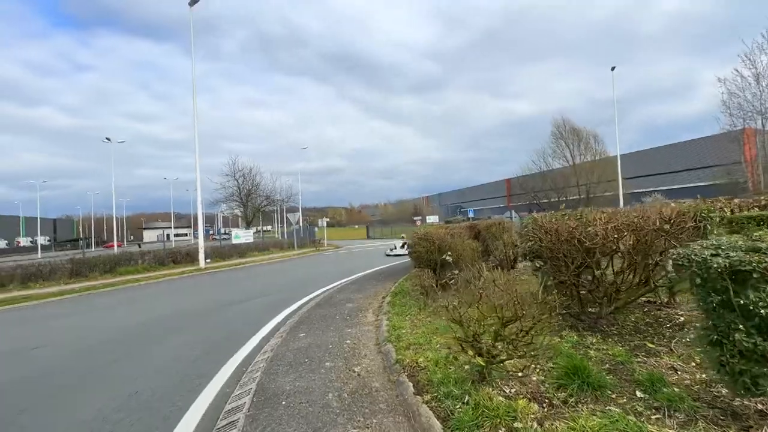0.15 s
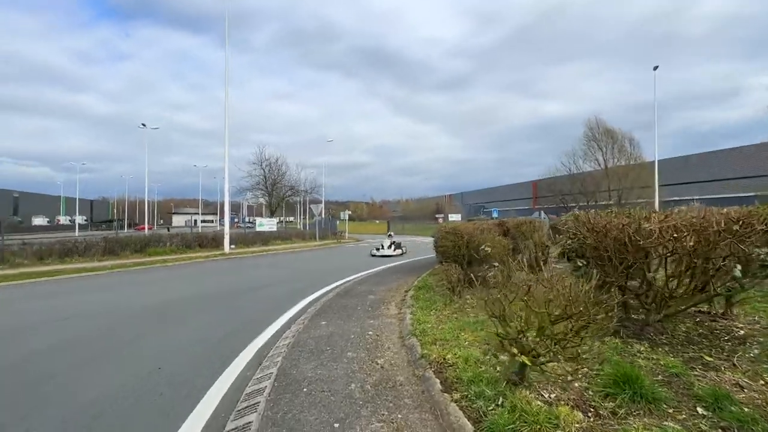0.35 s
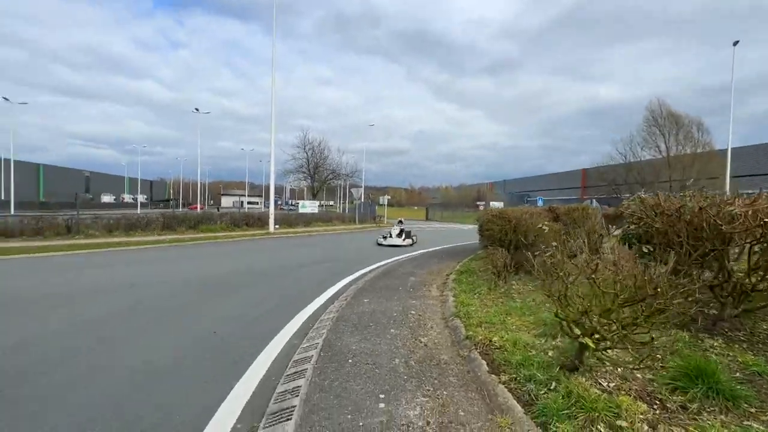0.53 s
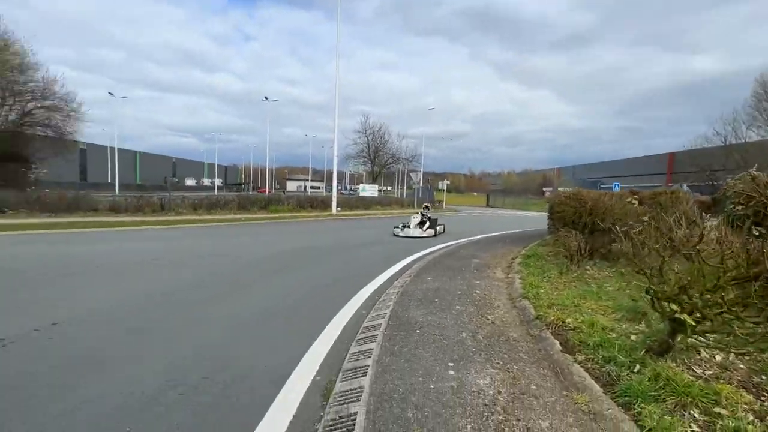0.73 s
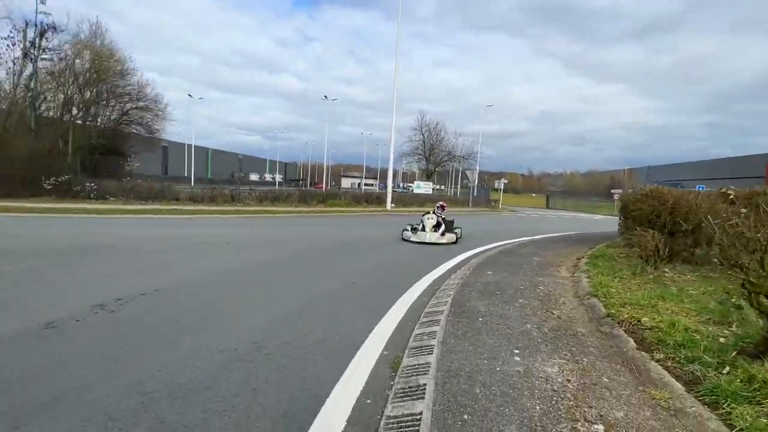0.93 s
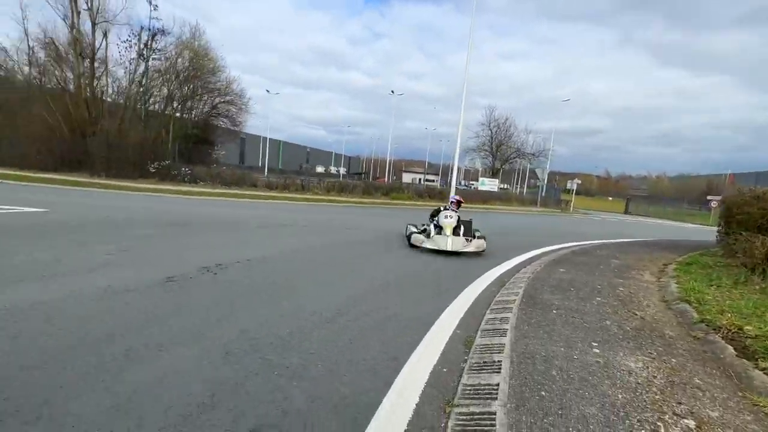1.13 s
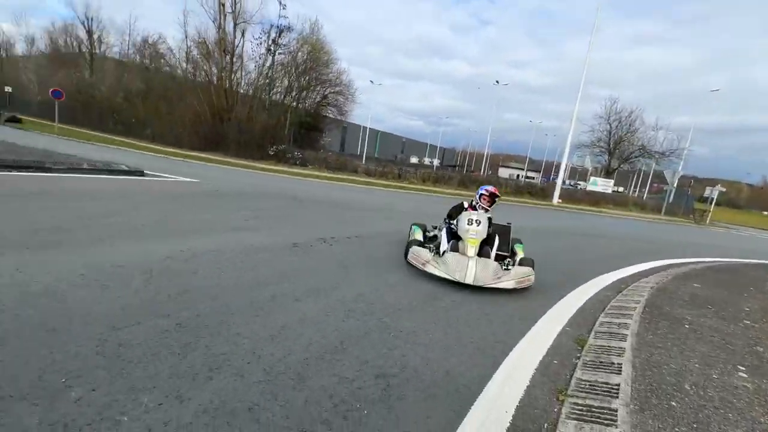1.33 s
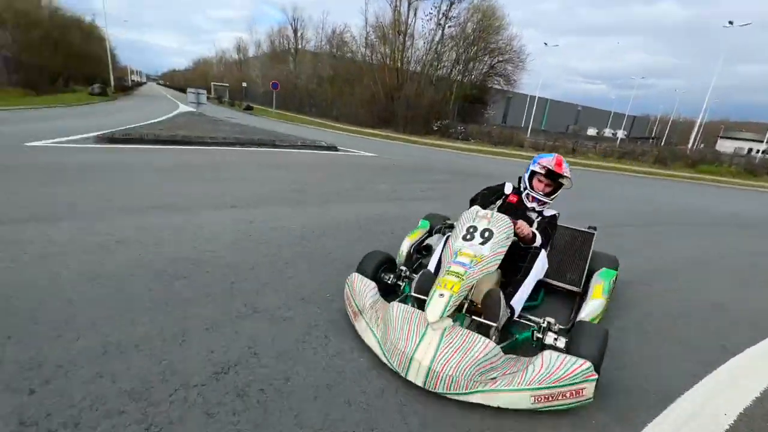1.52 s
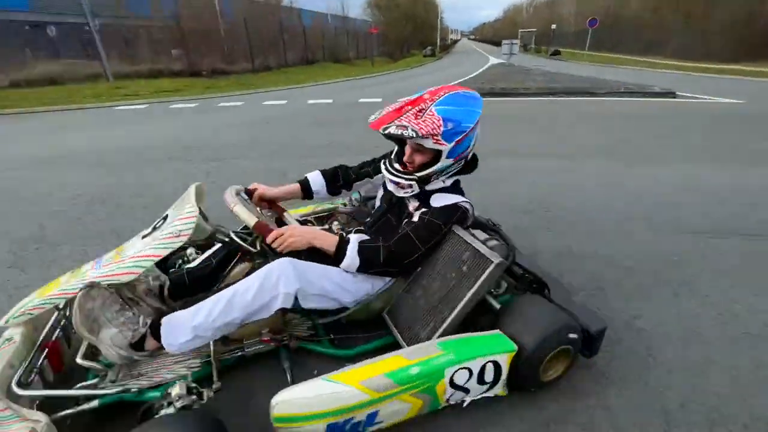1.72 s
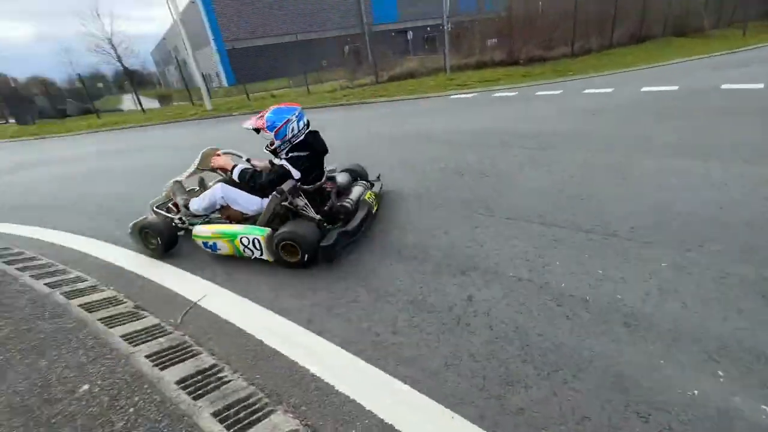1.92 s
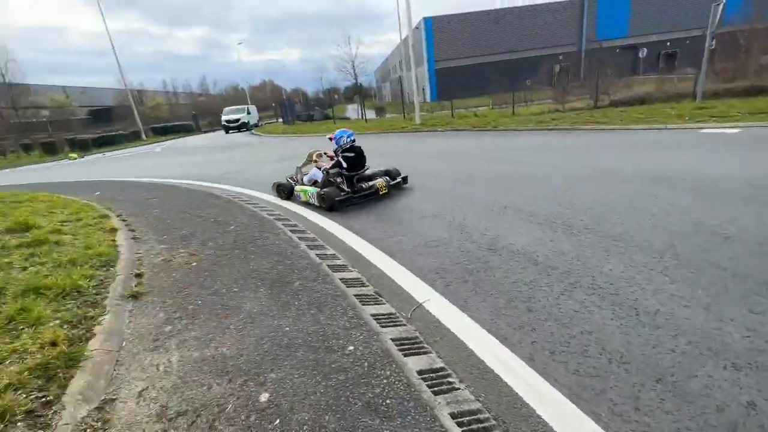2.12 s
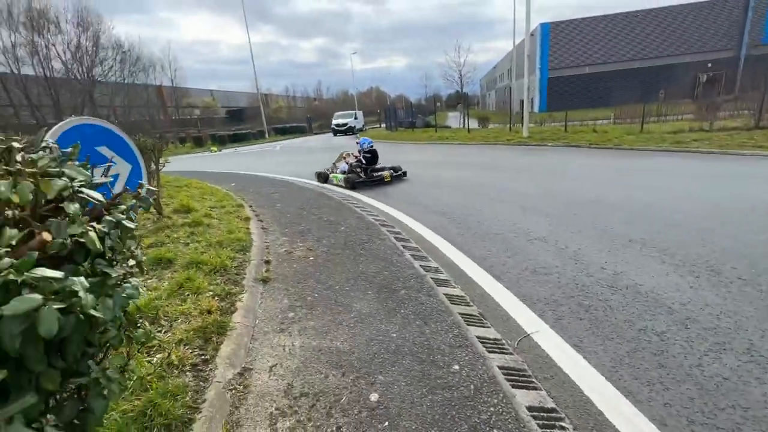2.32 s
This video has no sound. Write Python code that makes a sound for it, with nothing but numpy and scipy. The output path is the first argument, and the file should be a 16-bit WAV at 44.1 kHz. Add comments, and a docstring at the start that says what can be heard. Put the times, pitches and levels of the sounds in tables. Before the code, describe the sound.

A small racing kart engine is quiet and distant at first, its note sagging until 0.3 s, then rising quickly from 0.45 s to a buzzing drone near 0.9 s. Faint tyre chirps sound around 0.3-0.5 s. It swells, choppy and raspy, to a close pass at 1.3-1.85 s, with a short high squeal at 1.8 s, drops near 2 s, then revs away. Low wind and dull echoes accompany it.

```python
"""On a paved road a racing kart comes up, lifts off, opens the throttle, sweeps close by and accelerates away.
Every firing gives an exhaust pulse (a stack of sine orders), a crack (ringing shell modes) and a puff of
rasp (gated noise); the airbox honks under throttle. A treble hiss swells with the pass, drops, then jumps
back up as the kart leaves. The note turns choppy and the tyres chirp in the bends, as gliding sine tones.
Wind rumbles on the microphone as low noise, and far buildings return delayed, dull echoes."""
import sys
import numpy as np
from scipy import signal
from scipy.io import wavfile
from scipy.ndimage import uniform_filter1d, minimum_filter1d

SR = 44100
rng = np.random.default_rng(int(sys.argv[2]) if len(sys.argv) > 2 else 0)


def wrap_up_sound(samples):
    """Save the sound to the file named by the first command line argument, as 16-bit audio."""
    columns = np.atleast_2d(samples).T
    # keep every value between -1 and 1, then stretch to whole-number steps
    tamed = np.clip(columns, -1, 1)
    steps = np.round(tamed * 32767).astype(np.int16)
    wavfile.write(sys.argv[1], SR, steps)


N = 104031
T = np.arange(N) / SR

# How alike left and right sound. Each row: frequency in Hz, correlation from -1 to 1.
LIKENESS = [(200,0.75),(400,0.65),(800,-0.03),(2400,0.35),(9000,-0.24),(13000,0.07)]


def from_db(db):
    """Decibels to gain."""
    return 10 ** (np.asarray(db) / 20)


def rms_one(x):
    """Scale to rms 1."""
    return x / np.sqrt(np.mean(x ** 2) + 1e-20)


def in_time(rows):
    """Automation curves: one per column after the seconds."""
    seconds, *columns = np.transpose(rows)
    return [np.interp(T, seconds, column) for column in columns]


def at_hz(points, hz):
    """Read a spectrum on a log-frequency axis."""
    f, value = np.transpose(points)
    return np.interp(np.log(hz), np.log(f), value)


def drift(rate_hz):
    """Slow random movement of rms 1: noise through a two-pole lowpass, run at every 40th sample."""
    step = 40
    r = np.exp(-2 * np.pi * rate_hz * step / SR)
    white = rng.standard_normal(N // step + 2002)
    slow = signal.lfilter([1], [1, -2 * r, r * r], white)[2000:]  # skip the filter's settling
    return np.interp(np.arange(N) / step, np.arange(len(slow)), rms_one(slow))


def sides(hz):
    """Left and right gains at a frequency; their mean is 1."""
    # Stereo balance. Each row: frequency in Hz, left minus right in dB.
    balance = [(100,0.5),(450,-2.5),(740,-9),(2200,-10),(3330,-7.5),(5500,-0.3)]
    ratio = from_db(at_hz(balance, np.atleast_1d(hz)))
    return np.array([2 * ratio, 2 + 0 * ratio]) / (1 + ratio)


def noise(colour, flicker_db, count):
    """Stereo noise in separately flickering bands across the span of a colour; mid rms 1."""
    edges = np.geomspace(colour[0][0], min(colour[-1][0], .45 * SR), count + 1)
    white = rng.standard_normal((2, 2, N))  # neighbouring bands take turns with two mid/side pairs
    out = 0
    for k, (low, high) in enumerate(zip(edges, edges[1:])):
        band = signal.butter(3, [low, high], "band", fs=SR, output="sos")
        mid, side = signal.sosfilt(band, white[k % 2])
        hz = np.sqrt(low * high)
        alike = np.clip(at_hz(LIKENESS, hz), -.95, .99)
        pair = np.sqrt(1 + alike) * mid + np.sqrt(1 - alike) * side * [[1], [-1]]
        gain = from_db(at_hz(colour, hz) + flicker_db * drift(10.8))
        out = out + gain * sides(hz) * pair
    return out / np.std(out.mean(0))


def wind():
    """Lumpy low noise rumbles on the microphone, strongest as the kart passes."""
    # Wind level. Each row: time in seconds, level in dB.
    gusts = [(0.04,-73),(0.63,-49.5),(1.23,-53.5),(1.29,-38.5),(1.56,-41),(1.85,-39.5),(2.3,-58)]
    # Rumble colour. Each row: frequency in Hz, relative density in dB per Hz.
    colour = [(55,1.5),(80,8.2),(125,6.4)]
    level_db, = in_time(gusts)
    return from_db(level_db) * noise(colour, flicker_db=2.5, count=4)


def buildings(x):
    """Far walls return a few delayed copies, dulled and thinned by a gentle bandpass."""
    # Echoes. Each row: delay in seconds, left gain in dB, right gain in dB.
    echoes = [(0.095,-16,-9.5),(0.162,-12,-14.5)]
    band = signal.butter(1, [353, 1470], "band", fs=SR, output="sos")
    dull = signal.sosfilt(band, x.mean(0))
    out = 0
    for delay, left_db, right_db in echoes:
        late = np.interp(T - delay, T, dull, left=0)
        out = out + from_db([[left_db], [right_db]]) * late
    return out


def tyres():
    """Each squeal is a wavering stick-slip tone that swells and fades."""
    # Squeals. Each row: start in seconds, length in seconds, start pitch in Hz, end pitch in Hz, level in dB.
    squeals = [(0.307,0.052,1099,1100,-34.5),(0.367,0.136,1080,1120,-33.5),(1.807,0.062,2545,2590,-22.5)]
    waver = 0.02  # rms share of the pitch
    out = 0
    for start, length, start_hz, end_hz, db in squeals:
        along = np.clip((T - start) / length, 0, 1)
        hz = (start_hz + (end_hz - start_hz) * along) * (1 + waver * drift(95.4))
        swell = np.abs(np.sin(np.pi * along)) ** 0.35
        level = from_db(db + 3.8 * drift(45))
        tone = np.sqrt(2) * np.sin(2 * np.pi * np.cumsum(hz) / SR)
        out = out + swell * level * sides(start_hz) * tone
    return out


def rasp(cycles, bend, bark_db, rasp_db):
    """Gas noise and clatter puff with each firing, under an ungated treble hiss."""
    # Noise colours of gas bark, clatter and hiss. Each row: frequency in Hz, relative density in dB per Hz.
    bark_colour, clatter_colour, hiss_colour = [(240,-2),(520,2),(800,0),(1100,-3),(1700,-3.5),(2500,0),(3200,-10)], [(3000,-15),(4000,-0.5),(5000,-3.5),(6300,-0.5),(7700,-5),(10200,-2)], [(10000,-10),(12400,0),(16000,0)]
    # Hiss level before the firing-strength drift. Each row: time in seconds, level in dB.
    hiss_level = [(0.04,-65),(0.38,-57),(0.46,-47),(1.02,-42),(1.66,-32),(1.75,-25),(1.87,-30),(1.91,-39),(2.06,-41),(2.08,-32),(2.36,-33)]
    bark_trim_db, clatter_trim_db, bend_roar_db = -4, -1, 4
    puff_depth, puff_decay_cycles, treble_share = 1.3, .3, .5
    puff = puff_depth * np.exp(-(cycles % 1) / puff_decay_cycles)
    bark_gain = from_db(bark_db + bark_trim_db + bend_roar_db * bend)
    bark = bark_gain * noise(bark_colour, flicker_db=3.53, count=12)
    clatter = from_db(rasp_db + clatter_trim_db) * noise(clatter_colour, flicker_db=1.58, count=10)
    hiss = from_db(in_time(hiss_level)[0]) * noise(hiss_colour, flicker_db=2.5, count=5)
    return rms_one(1 + puff) * bark + rms_one(1 + treble_share * puff) * clatter + hiss


def crackle(cycles):
    """Each firing cracks the silencer shell with a strength of its own; the shell rings for milliseconds."""
    # Shell resonances. Each row: frequency in Hz, relative strike in dB.
    modes = [(2150,1.5),(2750,-2),(4400,-9)]
    # Crackle level. Each row: time in seconds, level in dB.
    level = [(0.3,-53),(0.96,-41),(1.05,-28.5),(1.6,-26),(2.0,-46),(2.26,-30),(2.36,-32)]
    spread_db, t60_s = 1.8, .002  # t60 of one resonator; two run in series
    firings = np.flatnonzero(np.diff(np.floor(cycles)))
    force_db = spread_db * np.clip(rng.standard_normal(len(firings)), -2, 2)
    r = from_db(-60 / (t60_s * SR))
    out = 0
    for hz, db in modes:
        clicks = np.zeros((2, N))
        clicks[:, firings] = from_db(db + force_db) * rng.standard_normal((len(firings), 2)).T
        w = 2 * np.pi * hz / SR
        resonator = [1, 0, -1, 1, -2 * r * np.cos(w), r * r]
        ring = signal.sosfilt([resonator, resonator], clicks + 1e-18)  # tiny offset avoids denormals
        out = out + sides(hz) * ring
    return from_db(in_time(level)[0]) * rms_one(out)


def exhaust(hz, cycles, bend, coasting, bark_db, count=22):
    """Two strong low orders, then higher ones coloured by pipe and airbox, fading as the kart moves."""
    # Boom of the two lowest orders. Each row: time in seconds, first order in dB, second order in dB.
    boom = [(0.04,-36.5,-40.5),(0.29,-39.5,-43),(0.4,-36.5,-40),(0.46,-42,-33),(0.5,-28.5,-33.5),(0.75,-24,-28),(0.81,-31,-21),(0.9,-18.5,-23),(0.94,-36,-22),(0.99,-22,-23.5),(1.05,-20.5,-28),(1.1,-20.5,-19),(1.28,-13,-23),(1.36,-21,-27.5),(1.45,-14,-20.5),(1.62,-24,-24),(1.66,-16.5,-18),(1.76,-21,-37),(1.81,-15.5,-21),(1.86,-28,-41),(1.92,-29,-26),(2.03,-25,-34.5),(2.09,-31.5,-31.5),(2.16,-31,-23),(2.21,-27,-31),(2.36,-41,-32.5)]
    # Pipe colour of the higher orders. Each row: frequency in Hz, gain on the bark level in dB.
    pipe_colour = [(600,-10),(690,-5.5),(1200,-12.5),(2300,-15),(4500,-22)]
    # Airbox honk at its resonance. Each row: time in seconds, level in dB.
    honk_level = [(1.2,-50),(1.35,-25.5),(1.6,-24),(1.66,-30),(1.84,-26),(1.95,-40),(2.26,-34.5)]
    airbox_hz, airbox_width_hz = 1166, 274
    coasting_db, fade_db, fade_hz = -9, 3.0, 12  # higher orders: off-throttle drop, fading
    jitter_cycles, chop_db, warble_cycles, upper_ragged = .012, 3.0, .09, .5
    boom_db = in_time(boom)
    honk = from_db(in_time(honk_level)[0])
    turn = 2 * np.pi * (cycles + jitter_cycles * drift(79))
    out = 0
    for k in range(1, count + 1):
        order_hz = k * hz
        if k <= 2:
            gain = from_db(boom_db[k - 1])
        else:
            pipe_db = bark_db + coasting_db * coasting + at_hz(pipe_colour, order_hz)
            pipe = from_db(pipe_db + fade_db * drift(fade_hz))
            detune = 2 * (order_hz - airbox_hz) / airbox_width_hz
            gain = np.hypot(pipe, honk / (1 + detune ** 2))
        ragged = bend + coasting + upper_ragged * min(k / 4, 1)
        chop = from_db(chop_db * ragged * drift(34.0))
        warble = 2 * np.pi * warble_cycles * ragged * drift(22)
        # the less alike the two sides, the more their phases wander apart
        spread = np.sqrt(np.clip(1 - at_hz(LIKENESS, k * hz.mean()), 0, 1))
        wander = 0.66 * spread * np.array([drift(8.7), drift(7.4)])
        phase = rng.uniform(0, 2 * np.pi) + warble + wander
        out = out + gain * chop * sides(order_hz) * np.sqrt(2) * np.sin(k * turn + phase)
    return out


def scene():
    """The kart with its uneven firings, its echoes and the wind."""
    # Firing rate before its small wobble. Each row: time in seconds, rate in Hz.
    revs = [(0.04,177.9),(0.26,132.3),(0.38,139),(0.45,169.4),(0.5,207.3),(0.6,219.6),(0.74,233.7),(0.93,245.7),(1.02,231.9),(1.13,240.8),(1.22,237.6),(1.29,230.5),(1.36,218.1),(1.44,227.8),(1.5,222.1),(1.58,224.8),(1.68,201.1),(1.77,211.3),(1.87,204.2),(2.0,173.1),(2.08,166.9),(2.15,198.7),(2.21,192.2),(2.36,223.4)]
    # Engine noise before trims and drifts. Each row: time in seconds, bark in dB, rasp in dB.
    levels = [(0.04,-37.5,-51),(0.36,-37,-47.5),(0.46,-28.5,-38.5),(0.66,-29,-34.5),(0.97,-25,-36),(1.25,-21.5,-28.5),(1.5,-19,-24.5),(1.66,-23.5,-23.5),(1.77,-21,-20.5),(1.86,-20.5,-29.5),(1.905,-31,-31.5),(2.06,-26.5,-34.5),(2.27,-25.5,-32.5),(2.36,-29.5,-36.5)]
    rev_wobble, firing_spread_db = .003, 1.0
    bend_s, bend_width_s = 1.657, 0.32  # the note is choppiest here and the roar grows
    even_hz, ragged_hz = 200, 150  # off the throttle: even firing above the first, fully ragged at the second
    hz = in_time(revs)[0] * (1 + rev_wobble * drift(15.75))
    cycles = np.cumsum(hz) / SR
    bend = np.exp(-((T - bend_s) / bend_width_s) ** 2)
    coasting = np.interp(hz, [ragged_hz, even_hz], [1, 0])
    strength = from_db(firing_spread_db * drift(42))
    bark_db, rasp_db = in_time(levels)
    kart = exhaust(hz, cycles, bend, coasting, bark_db)
    kart = kart + strength * rasp(cycles, bend, bark_db, rasp_db)
    kart = kart + crackle(cycles) + tyres()
    return kart + buildings(kart) + wind()


def record(dry):
    """The sound starts abruptly, the top is cut and a limiter holds the peaks."""
    start_s, cutoff_hz = .036, 15900
    ceiling, limiter_s = .9, .008
    lowpass = signal.ellip(12, .1, 90, cutoff_hz, fs=SR, output="sos")
    x = signal.sosfilt(lowpass, dry * (T > start_s))
    size = int(limiter_s * SR)
    room = ceiling / np.maximum(np.abs(x).max(0), ceiling)  # gain that keeps the louder side at the ceiling
    return x * uniform_filter1d(minimum_filter1d(room, 2 * size), size)


dry = scene()
out = record(dry)
wrap_up_sound(out)
```